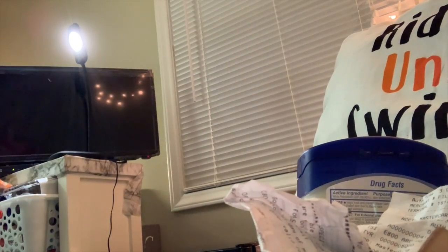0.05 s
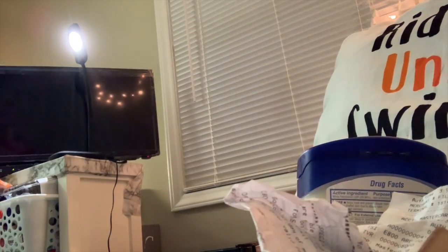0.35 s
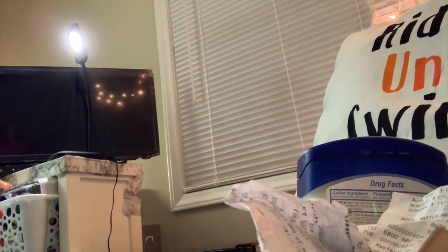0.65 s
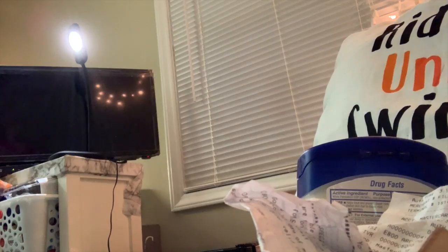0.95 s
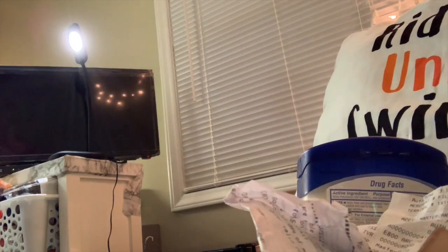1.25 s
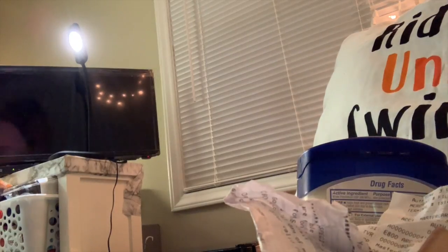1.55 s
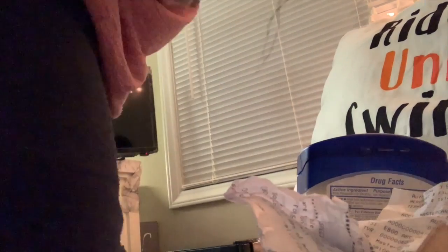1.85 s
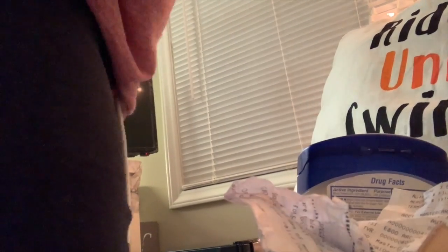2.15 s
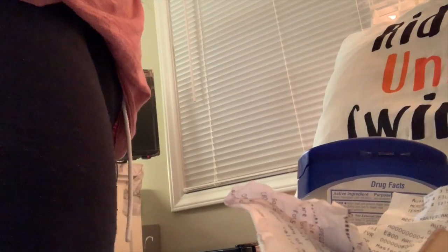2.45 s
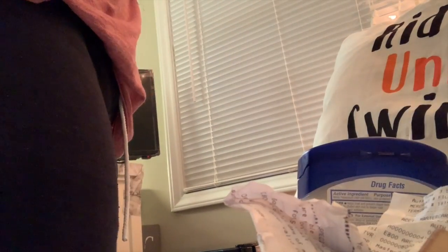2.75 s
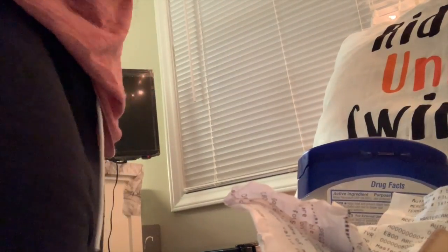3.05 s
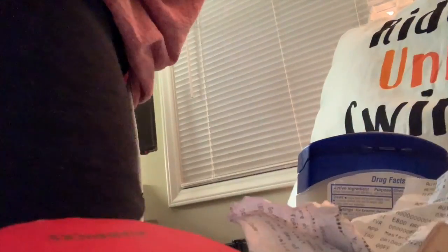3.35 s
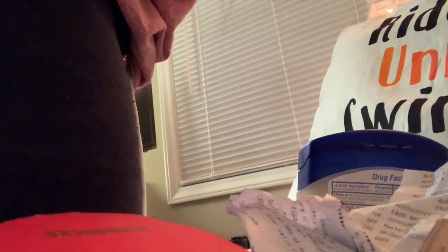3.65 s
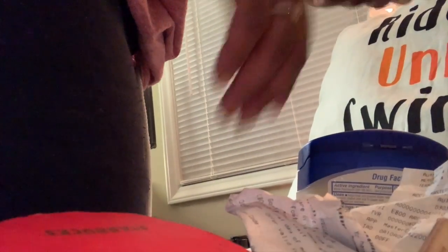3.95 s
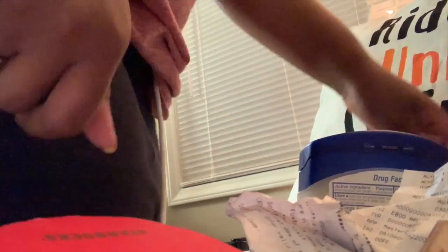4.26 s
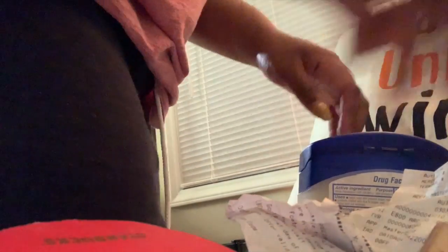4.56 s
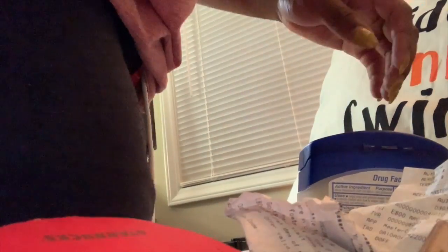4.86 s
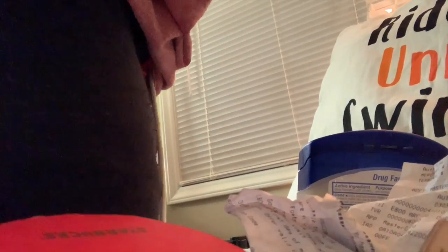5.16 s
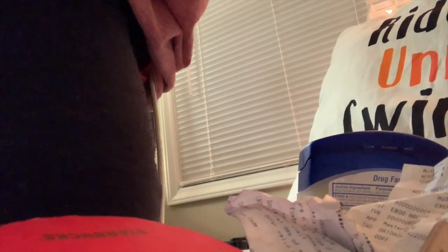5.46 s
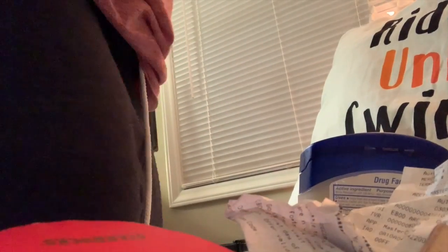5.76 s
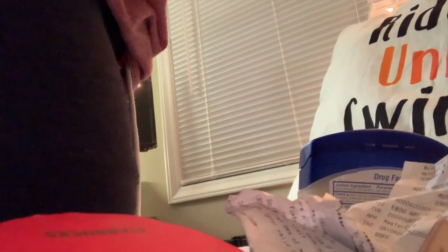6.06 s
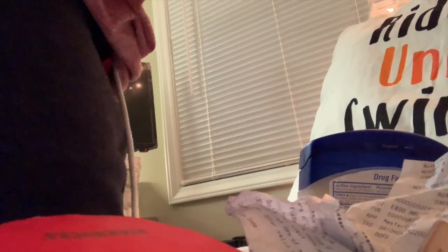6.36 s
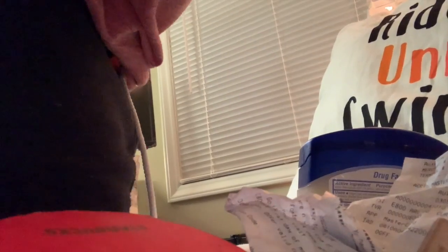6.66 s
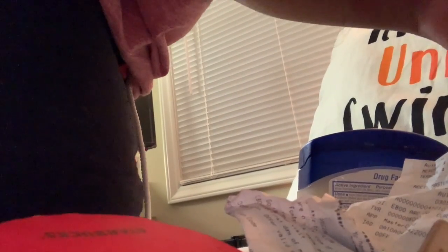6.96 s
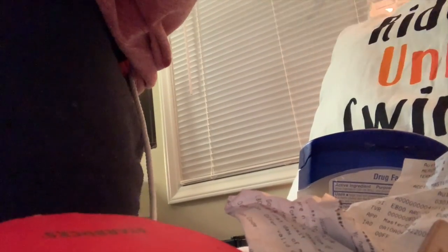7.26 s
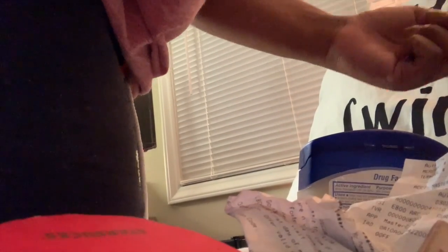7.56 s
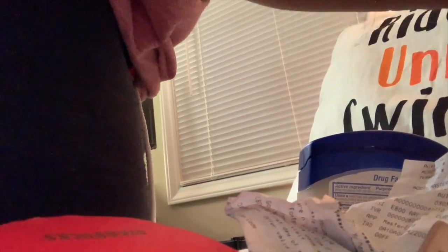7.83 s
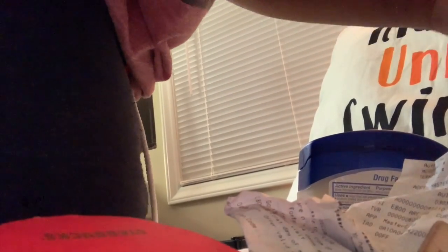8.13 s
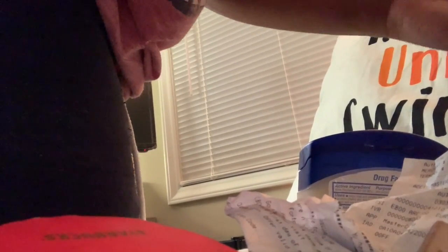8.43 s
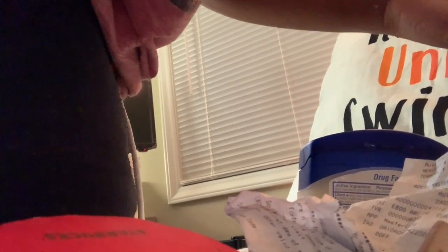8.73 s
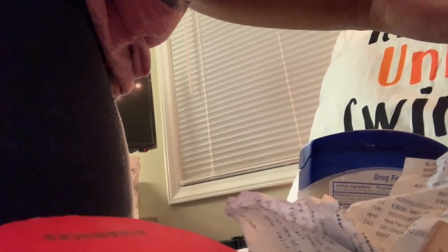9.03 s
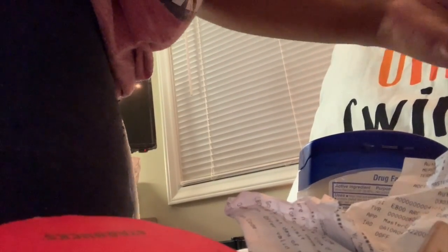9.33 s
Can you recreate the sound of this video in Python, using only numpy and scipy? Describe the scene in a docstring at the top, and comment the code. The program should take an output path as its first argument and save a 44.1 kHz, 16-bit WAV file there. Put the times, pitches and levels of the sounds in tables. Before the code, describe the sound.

Close clicks, taps and paper rustles come in bursts as small objects are picked up and set down, with a fan humming faintly.

```python
"""Clicks, knocks and rustles, close by on the right: small plastic things are picked up, shuffled and
set down on a nightstand. Each contact excites the resonances of the top; paper and wrappers crease and
slide in between. Hard blows set a thin metal part ringing, and a hollow tub is knocked once.
A faint fan hums in the small bedroom and sags in speed for a while."""
import sys
import numpy as np
from scipy import signal
from scipy.fft import rfft, irfft
from scipy.io import wavfile

SR = 44100
rng = np.random.default_rng(int(sys.argv[2]) if len(sys.argv) > 2 else 0)


def generate_wav(signal):
    """Clip the signal to [-1, 1] and save it as 16-bit WAV at the path in sys.argv[1]."""
    frames = np.transpose(np.atleast_2d(signal))
    scaled = np.clip(frames, -1, 1) * 32767
    pcm = np.round(scaled).astype(np.int16)
    wavfile.write(sys.argv[1], SR, pcm)


N = 418494
TIME = np.arange(N) / SR
CUTOFF_HZ = 16100
# paper bands scrape, rustle, crinkle: (gain [dB], gain per brightness [dB/dB])
PAPER_GAINS = [(1.5, -1.0), (6, 0.2), (0.05, 2)]


def from_db(db):
    """Decibels to gain."""
    return 10 ** (np.asarray(db) / 20)


def rms_one(x):
    """Scale to rms 1."""
    return x / np.sqrt(np.mean(x ** 2) + 1e-20)


def at_hz(points, hz):
    """Interpolate on a log-frequency axis."""
    freqs, values = np.transpose(points)
    return np.interp(np.log(np.maximum(hz, 1)), np.log(freqs), values)


def band(x, low_hz, high_hz, order=3):
    """Causal band-pass."""
    return signal.sosfilt(signal.butter(order, [low_hz, high_hz], "band", fs=SR, output="sos"), x + 1e-18)


def colour(x, points, size=2048):
    """Minimum-phase filter through points (frequency [Hz], gain [dB])."""
    cepstrum = irfft(np.log(from_db(at_hz(points, np.fft.rfftfreq(size, 1 / SR)))))
    cepstrum[1:size // 2] *= 2
    cepstrum[size // 2 + 1:] = 0
    response = irfft(np.exp(rfft(cepstrum)))
    return signal.oaconvolve(x, np.array(response, ndmin=x.ndim), axes=-1)[..., :x.shape[-1]]


def drift(rate_hz):
    """Random wander, rms 1."""
    knots = rng.standard_normal(int(rate_hz * N / SR) + 2)
    return rms_one(np.interp(TIME * rate_hz, np.arange(len(knots)), knots))


def add(out, start_s, sound):
    """Mix a sound in at start_s."""
    at = int(round(start_s * SR))
    out[..., at:at + sound.shape[-1]] += sound[..., :out.shape[-1] - at]


def fan_hum(waver_db=2.5, wobble=.013):
    """Two tones follow the fan speed, two hold their pitch; all waver in level."""
    fan = [(0, 61.1, -77), (2.001, 57.9, -72), (2.451, 54.9, -67.5), (2.7, 54, -61), (3.0, 53.16, -55.5),
           (3.15, 49.96, -54), (3.4, 53.83, -57), (4.001, 53.65, -58.5), (4.6, 53.43, -64.5),
           (5.3, 54.6, -63), (5.799, 60.38, -64), (9.49, 59.4, -62.5)]  # (time [s], speed [Hz], level [dB])
    harmonics = [(5, -4), (8, -5.5)]  # (multiple of speed, gain [dB])
    hum = [(75.4, -65.5), (236.9, -63.5)]  # (frequency [Hz], level [dB])
    times_s, speed_hz, fan_db = np.transpose(fan)
    turns = np.cumsum(np.interp(TIME, times_s, speed_hz) * (1 + wobble * drift(12))) / SR
    tones = [(k * turns, np.interp(TIME, times_s, fan_db) + db) for k, db in harmonics]
    tones += [(hz * TIME + .26 * drift(4.8), db) for hz, db in hum]
    return sum(np.sqrt(2) * np.sin(2 * np.pi * cycles) * from_db(db + waver_db * drift(4.7))
               for cycles, db in tones)


def room_air(level_db=-57, side_db=-13):
    """Dull noise: nearly the same bass at both microphone ports, unrelated hiss."""
    spectrum = [(28, -23), (48, -18), (62, -18.5), (78, -4), (125, -5.5), (229, -2.5), (326, -11),
                (384, -13.5), (489, -8), (695, -21.5), (988, -25), (1800, -39.5), (4000, -50), (15000, -54)]  # (frequency [Hz], relative density [dB])
    mid, side = (rms_one(colour(rng.standard_normal(N), spectrum, size=8192)) for _ in range(2))
    side = from_db(side_db) * side + .7 * band(side, 1200, 18000, order=1)
    return from_db(level_db) * (mid + side * np.array([[1], [-1]]))


def bedroom(x, gap_s=.006, size=18000):
    """Soft walls return a faint tail that dies sooner in the treble."""
    decay_times = [(100, .35), (1000, .3), (4000, .25), (15000, .16)]  # (frequency [Hz], t60 [s])
    tail_gains = [(100, -20), (600, -24), (2500, -37), (8000, -30), (15000, -38)]  # (frequency [Hz], gain [dB])
    t, edges_hz = np.arange(size) / SR, np.geomspace(80, 17000, 9)
    white, response = rng.standard_normal((2, size)), 0
    for low, high in zip(edges_hz, edges_hz[1:]):
        hz = np.sqrt(low * high)
        decay = from_db(-60 * t / at_hz(decay_times, hz)) * (t > gap_s)
        decay /= np.linalg.norm(decay)
        response += from_db(at_hz(tail_gains, hz)) * band(white, low, high, order=2) * decay
    return signal.fftconvolve(x, response, axes=1)[:, :N]


def casing_shadow(x):
    """Sound bends round the microphone casing to the left port, late and shaded; total power is kept."""
    shading = [(100, 0), (380, -1.5), (700, -1.5), (1290, -.5), (2380, -9), (4400, -8), (8120, -5.5),
               (15000, -5.5)]  # (frequency [Hz], left minus right [dB])
    left_lag = [(0, 0), (500, .15), (1210, .45), (2150, 1.1), (3530, 3.5), (4390, 4.5), (6030, 4.7),
                (8870, 6.2), (10600, 7.7), (13700, 8.5), (16000, 11)]  # (frequency [Hz], lag [rad])
    hz = np.fft.rfftfreq(N, 1 / SR)
    shade = from_db(at_hz(shading, hz))
    lag_rad = np.interp(hz, *np.transpose(left_lag))
    left, right = rfft(x) * np.sqrt(2 / (1 + shade ** 2))
    return irfft(np.array([left * shade * np.exp(-1j * lag_rad), right]), N)


def clutter_scatter(direct, scattered):
    """Both ports share the direct sound; sound scattered off the clutter arrives with opposite signs."""
    share = [(150, -22.5), (500, -20.5), (1200, -20.5), (2400, 3), (6000, -7.5), (15000, 7)]  # (frequency [Hz], gain [dB])
    return direct + colour(scattered, share) * np.array([[1], [-1]])


def nightstand_top(force, direct_db=-4):
    """Contact noise, heard directly and through the resonances of the top and what stands on it."""
    contact = [(150, -8), (400, -2.5), (1500, 2), (3000, 10), (4400, 1), (5500, -2), (7500, -4),
               (10500, -10.5), (12500, -12), (16000, -20)]  # (frequency [Hz], gain [dB])
    resonances = [(241, 63, -2), (370, 160, -6), (475.7, 68, -0.5), (838, 160, 3), (1172, 250, -5),
                  (1720, 49, 2), (1880, 49, -2), (2120, 120, 0), (2444, 28, -3), (3220, 1200, -14),
                  (3930, 450, -10.5), (5700, 72, -2), (6480, 990, -9)]  # (frequency [Hz], width [Hz], gain [dB])
    force = colour(force, contact)
    out = from_db(direct_db) * force
    for hz, width_hz, db in resonances:
        out += from_db(db) * signal.lfilter(*signal.iirpeak(hz, hz / width_hz, fs=SR), force)
    return out


def small_object(sound, pitches_hz, height, gain_db, q, reflection):
    """An object adds its own resonances; a reflection off the top cuts notches set by height (0-1)."""
    for hz in pitches_hz:
        sound = sound + from_db(gain_db) * signal.lfilter(*signal.iirpeak(hz, q, fs=SR), sound)
    lag = int(.00015 * 6 ** height * SR)
    return sound + reflection * np.pad(sound, ((0, 0), (lag, 0)))[:, :-lag]


def wrapper_ticks(ticks_per_s=9, level_db=-61, spread_db=4.5, low_hz=6000, t60_s=.012, size=900):
    """Crumpled wrappers relax with tiny bright ticks at random moments."""
    onsets = rng.random(N) < ticks_per_s / SR
    clicks = onsets * from_db(level_db + spread_db * np.clip(rng.standard_normal(N), -2, 2))
    crack = rng.standard_normal((2, size)) * from_db(-60 * np.arange(size) / SR / t60_s)
    return band(signal.oaconvolve(clicks[None], crack, axes=1)[:, :N], low_hz, CUTOFF_HZ, order=2)


def paper(creases_per_s, size_db, friction_db, snaps_per_s, snap_db, clump_db, clumps_per_s, patchy_db):
    """Clumps of fine creases and sharp snaps over sliding friction; three bands, each rms 1."""
    bands_hz = [(330, 1600), (1600, 4500), (4500, 16000)]  # scrape, rustle, crinkle: (low [Hz], high [Hz])
    sizes = from_db(size_db * np.minimum(rng.exponential(1, N), 4)) * rng.choice([-1, 1], (2, N))
    creases = rms_one(sizes * (rng.random(N) < creases_per_s / SR))
    snaps = rms_one(sizes * (rng.random(N) < snaps_per_s / SR))
    force = creases + from_db(snap_db) * snaps + from_db(friction_db) * rng.standard_normal((2, N))
    force *= from_db(clump_db * drift(clumps_per_s))
    sound = clutter_scatter(*nightstand_top(force, direct_db=-1.5))
    return [rms_one(band(sound, *edges) * from_db(patchy_db * drift(70))) for edges in bands_hz]


def rummage(brightness_db=-3):
    """Faint ticks and scuffs of rummaging and settling, dulled by distance."""
    envelope = [(0.051, -75.5), (.3, -68), (.55, -78.5), (.85, -70), (1.12, -83.5), (1.55, -82),
                (1.75, -92), (2.2, -76), (2.42, -61.5), (2.6, -79), (2.9, -100), (4.9, -91), (5.2, -66),
                (5.7, -79.5), (6.2, -78.5), (6.5, -87), (9.49, -93.5)]  # (time [s], level [dB])
    bands = paper(creases_per_s=830, size_db=2, friction_db=-2, snaps_per_s=26, snap_db=-1.5,
                  clump_db=4.5, clumps_per_s=50, patchy_db=8)
    sound = sum(from_db(db + slope * brightness_db) * part for part, (db, slope) in zip(bands, PAPER_GAINS))
    times_s, levels_db = np.transpose(envelope)
    return sound * np.interp(TIME, times_s, from_db(levels_db), left=0, right=0)


def rustle(rise_s=.004, fall_s=.0048, arch_db=1.5, linger=.032):
    """Each stroke grips the paper, swells or eases off, and lets go; its folds resonate at two pitches."""
    strokes = [(0.086, 0.016, -63, -3.5, -3), (0.141, 0.023, -50, -8.0, 13), (0.197, 0.032, -50, -2, 9),
               (0.367, 0.082, -68, -2.5, -2), (0.524, 0.032, -67, -6.5, 0),
               (0.736, 0.012, -57.5, -2.5, 7.5), (0.866, 0.014, -64, -7, 5), (1.518, 0.11, -76, -6.5, 4),
               (1.818, 0.12, -49, 0.5, -16), (1.989, 0.081, -51, -2, 1), (2.068, 0.13, -35, 0, -2.5),
               (2.209, 0.19, -51, -3.5, -9.5), (2.596, 0.052, -59, 1, 3), (2.656, 0.14, -75.5, 6, 12.5),
               (2.923, 0.11, -65, 5, 13.5), (3.107, 0.063, -63, 2, -4), (3.292, 0.087, -55, -1, -9),
               (3.453, 0.12, -51, 0.0, 17), (3.607, 0.15, -50.5, 0.5, 10.5), (3.784, 0.08, -47.5, 0.5, 3),
               (4.719, 0.14, -47, 1, 9.5), (4.87, 0.14, -54, 0.5, -4), (5.036, 0.079, -47.5, -2, -2.5),
               (5.145, 0.067, -48.5, 1, -3), (5.229, 0.13, -62, 0, 14), (5.366, 0.14, -44.5, 0, 8.5),
               (5.563, 0.053, -37.5, 0, 22), (5.915, 0.031, -64, -0.5, 2.5),
               (6.051, 0.065, -46.5, 4.5, -2.5), (6.208, 0.049, -68.5, 1.5, -4),
               (6.346, 0.064, -38, -1, -10.5), (6.555, 0.18, -39.5, 0.5, 1.5),
               (6.773, 0.11, -43.5, 1.0, -9.5), (6.9, 0.099, -43, 0.0, 7.5),
               (7.006, 0.117, -56.5, -3, 13.5), (7.572, 0.21, -44, 1, 6), (7.995, 0.062, -38, 0, 0),
               (8.183, 0.019, -63, -8.5, 0), (8.273, 0.088, -52.5, 0, 8), (8.393, 0.045, -61, -1, 4),
               (8.501, 0.071, -34, -2.5, 7.5), (8.588, 0.064, -33, -2, 10), (8.679, 0.12, -43.5, -2.5, -7),
               (8.839, 0.067, -49.5, 2, -20), (8.919, 0.094, -48.5, -3, 1.5), (9.02, 0.046, -66, -5, -4),
               (9.372, 0.065, -43, -0.5, 13), (9.459, 0.037, -52, 1, 25)]  # (time [s], length [s], level [dB], brightness [dB], growth [dB])
    bands = paper(creases_per_s=750, size_db=3, friction_db=-3.5, snaps_per_s=90, snap_db=-3.5,
                  clump_db=4, clumps_per_s=110, patchy_db=2)
    out = np.zeros((2, N))
    for start_s, length_s, db, brightness_db, growth_db in strokes:
        folds_hz = np.array([1400, 3200]) * np.array([2.4, 3]) ** rng.random(2)
        height = rng.random()
        release_s = fall_s + linger * length_s
        span = slice(int(start_s * SR), int((start_s + length_s + 5 * release_s) * SR))
        t = TIME[span] - TIME[span][0]
        grip = (1 - np.exp(-t / rise_s)) * np.exp(-np.maximum(t - length_s, 0) / release_s)
        progress = np.minimum(t / length_s, 1)
        swell_db = growth_db * (progress - .5) + arch_db * (np.sin(np.pi * progress) - .5)
        pressure = grip * from_db(db + swell_db)
        for part, (band_db, slope) in zip(bands, PAPER_GAINS):
            sound = small_object(part[:, span], folds_hz, height, gain_db=1, q=42, reflection=.45)
            add(out, start_s, from_db(band_db + slope * brightness_db) * pressure * rms_one(sound))
    return out


def struck(hits, modes, vary_db=.5):
    """Every blow rings all modes as decaying sines, each at a slightly random strength."""
    out = np.zeros(N)
    for hz, mode_db, t60_s in modes:
        clicks = np.zeros(N)
        for start_s, db in hits:
            add(clicks, start_s, from_db([db + mode_db + vary_db * rng.standard_normal()]))
        radius, step_rad = from_db(-60 / (t60_s * SR)), 2 * np.pi * hz / SR
        feedback = [1, -2 * radius * np.cos(step_rad), radius ** 2]
        out += signal.lfilter([0, np.sin(step_rad)], feedback, clicks + 1e-18)
    return out


def metal_ring():
    """Blows shake a thin metal part, which rings on."""
    hits = [(1.919, -60.5), (2.115, -48), (2.186, -44.5)]  # (time [s], level [dB])
    modes = [(880, -14, 4.4), (1176, -8, 1.1), (1220, -11, .8), (1281, -13.5, .8), (1410, -11.5, .9),
             (1570, -4, .6), (1810, -16.5, .6), (2494, -8.5, .35), (2500, 2.5, .45), (2842, -12, .45),
             (3644, -8, .4), (5800, -14.5, .35), (5950, -14.5, .6)]  # (frequency [Hz], gain [dB], t60 [s])
    return struck(hits, modes)


def tub_knock():
    """One knock on a hollow tub; its modes die fast."""
    hits = [(6.6165, -15.5)]  # (time [s], level [dB])
    modes = [(1225, 1, 0.065), (1000, -6, 0.0421), (3550, 3.5, 0.031), (5098, -20, .03)]  # (frequency [Hz], gain [dB], t60 [s])
    return struck(hits, modes)


def bumps(t60_cycles=17.4, rise_s=.0017, spread=.22, trim_db=-2, thud_db=-9, size=12000):
    """A soft push on furniture or floor rings three close low modes inside a dull thud."""
    pushes = [(0.218, -30, 262), (.219, -22, 540), (1.512, -38.5, 102), (3.325, -32.5, 194),
              (3.358, -30.5, 187), (3.557, -34.5, 159), (5.064, -30, 224), (5.205, -30, 101),
              (5.343, -33, 250), (5.42, -24, 255), (5.467, -17, 392), (5.491, -23, 312), (5.604, -11, 416),
              (5.622, -24, 231), (5.94, -30.5, 145), (6.052, -37, 130), (6.394, -24, 241),
              (6.578, -23, 258), (6.589, -27.5, 135), (6.649, -29, 268), (7.452, -31.5, 213),
              (8.012, -28.5, 196), (8.618, -9, 460), (8.62, -34.5, 113.3), (8.645, -7.5, 494)]  # (time [s], level [dB], pitch [Hz])
    t, out = np.arange(size) / SR, np.zeros(N)
    for start_s, db, hz in pushes:
        modes = np.sin(2 * np.pi * hz * t)
        for side in (-1, 1):
            side_hz = hz * (1 + side * spread * rng.uniform(.6, 1.7))
            modes += .5 * np.sin(2 * np.pi * side_hz * t + rng.uniform(0, 2 * np.pi))
        thud = from_db(thud_db) * rms_one(band(rng.standard_normal(size), .7 * hz, 2.2 * hz, order=2))
        envelope = from_db(db + trim_db - 60 * t * hz / t60_cycles) * (1 - np.exp(-t / rise_s))
        add(out, start_s, envelope * (modes + thud))
    return out


def taps(lead_in_s=.005, lead_in_db=-18, spike=9, rise_s=.00032, attack_s=.006, grit_db=2, size=6000):
    """Plastic lands: a spike, a crack of tiny rebounds, an after-ring. Hard taps snap, soft ones knock."""
    contacts = [(0.2174, -34, -6.5, 610), (1.8219, -38, -10, 1650), (1.8279, -30.5, -4.5, 1650),
                (1.8604, -48, -1, 2670), (1.916, -28.5, -1, 810), (1.9196, -30, -2, 880),
                (1.932, -35, -7.5, 1010), (1.9715, -29.5, -2, 660), (2.0302, -35.5, 2, 2680),
                (2.077, -28, -2.5, 1110), (2.095, -29, 0, 5060), (2.1146, -20, -5.5, 910),
                (2.1652, -33, 4, 2330), (2.186, -29.5, 2, 930), (2.3363, -37.5, 2.5, 1480),
                (2.5103, -47, -4.5, 860), (2.728, -45.5, 4.5, 1460), (3.158, -57, -0.5, 6500),
                (3.2993, -50, -3.5, 650), (3.3487, -44.5, -0.5, 680), (3.4597, -33, -2.5, 1150),
                (3.4705, -33, 1, 860), (3.547, -26.5, -1, 1650), (3.6615, -32, 3.5, 3900),
                (3.7817, -29.5, 3, 3980), (3.8328, -25, -2, 1754), (4.367, -53, -5.5, 954),
                (4.4035, -55, 2, 750), (4.7466, -28.5, 2, 5630), (4.812, -44, 10, 3740),
                (4.8455, -24.5, 2.5, 4380), (4.864, -34.5, 4, 1400), (5.0621, -22.5, -2, 729),
                (5.2495, -37.5, 2.5, 2210), (5.4702, -33, -1, 820), (5.4843, -33, 1.5, 1090),
                (5.5832, -25, -6, 1160), (5.6008, -21.5, -3, 644), (5.6766, -49.5, -3.5, 849),
                (5.7945, -61.5, 1.5, 755), (5.8655, -44.5, -3, 3610), (6.059, -40, 5.5, 1830),
                (6.108, -37.5, -2, 653), (6.2742, -42, 1.5, 4810), (6.3188, -39, -2.5, 1560),
                (6.3489, -28.5, -5.5, 940), (6.391, -26.5, 1.5, 680), (6.6168, -28, -1.5, 1080),
                (6.6425, -32, 0.5, 3600), (6.7632, -47, -1.5, 3300), (6.7998, -37, 3, 5200),
                (6.8267, -35.5, 5.5, 2130), (6.9648, -36.5, 3.5, 1800), (7.1084, -36, 1, 1224),
                (7.316, -78, 6, 9000), (7.4769, -54.5, -4.5, 715), (7.5778, -36, -11.5, 860),
                (7.5994, -32.5, 8, 2970), (7.7316, -34, 7.5, 2188), (8.002, -37.5, 6.5, 3030),
                (8.0255, -31.5, 4, 2030), (8.2772, -34, -8, 820), (8.2865, -38.5, -3.5, 1330),
                (8.4404, -30, 0, 6660), (8.5316, -28, 0, 3440), (8.6146, -24.5, -7, 2950),
                (8.6417, -29, 5, 1750), (8.6604, -27.5, 0.5, 1420), (8.7082, -27.5, -3, 2650),
                (8.723, -24.5, -2.5, 2160), (8.755, -26, 0.5, 1830), (8.7622, -30.5, -1, 1990),
                (8.871, -28, 2.5, 1960), (8.8753, -28, -1, 1900), (8.9343, -40.5, 5, 3000),
                (9.0702, -42, -1.5, 2570), (9.1305, -23, -0.5, 2983), (9.3656, -38.5, -8.5, 650)]  # (time [s], level [dB], hardness [dB], object pitch [Hz])
    bands_hz = [(150, 600), (600, 1600), (1600, 4500), (4500, 16000)]  # knock, body, clack, snap: (low [Hz], high [Hz])
    decays = [(0.039, 0.097, -24), (0.027, 0.08, -21), (0.023, .07, -14), (0.011, 0.04, -9.5)]  # per band: (crack t60 [s], after-ring t60 [s], after-ring level [dB])
    gains = [(-9, -0.81), (1, -0.63), (5, 0.34), (-1.5, 0.84)]  # per band: (gain [dB], gain per hardness [dB/dB])
    t, shape = np.arange(size) / SR, (2, len(contacts), size)
    rebounds = rms_one(rng.standard_normal(shape) * from_db(grit_db * rng.standard_normal(shape)))
    heights = rng.random(len(contacts))
    hardness_db = np.array(contacts)[:, 2:3]
    sounds, out = np.zeros(shape), np.zeros((2, N))
    for edges, (crack_t60_s, ring_t60_s, ring_db), (band_db, slope) in zip(bands_hz, decays, gains):
        force = rebounds * (from_db(-60 * t / crack_t60_s) + from_db(ring_db - 60 * t / ring_t60_s))
        force *= 1 - np.exp(-t / rise_s)
        force[0, :, 2:3] += spike * from_db(.6 * hardness_db)  # direct path only
        stereo = clutter_scatter(*nightstand_top(force.reshape(2, -1)))
        part = band(stereo, *edges).reshape(shape)
        attack_rms = np.std(part[..., :int(attack_s * SR)], axis=(0, 2), keepdims=True)
        sounds += from_db(band_db + slope * hardness_db) * part / attack_rms
    for i, (start_s, db, _, hz) in enumerate(contacts):
        landing = small_object(sounds[:, i], [hz], heights[i], gain_db=2, q=6.6, reflection=.52)
        add(out, start_s, from_db(db) * landing)
        # a faint copy a few milliseconds early softens the attack
        add(out, start_s - lead_in_s * (.5 + heights[i]), from_db(db + lead_in_db) * sounds[:, i])
    return out


def scene():
    """Handled things, their room tail, fan and air."""
    things = taps() + bumps() + rustle() + rummage() + wrapper_ticks() + tub_knock() + metal_ring()
    return casing_shadow(things) + bedroom(things) + fan_hum() + room_air()


def record(dry):
    """Steep low-pass on the highest treble."""
    return signal.sosfilt(signal.ellip(10, .2, 70, CUTOFF_HZ, fs=SR, output="sos"), dry)


dry = scene()
out = record(dry)
generate_wav(out)
```